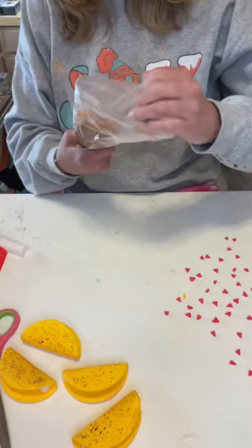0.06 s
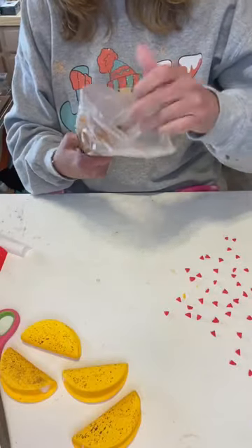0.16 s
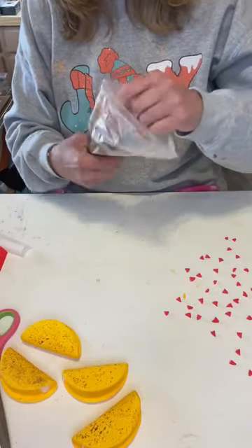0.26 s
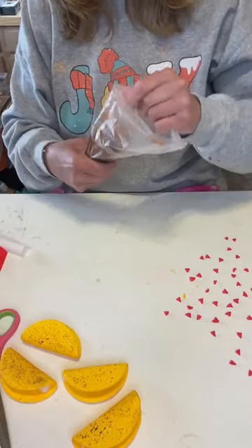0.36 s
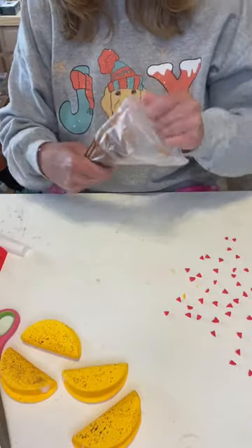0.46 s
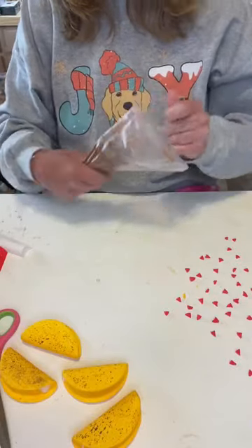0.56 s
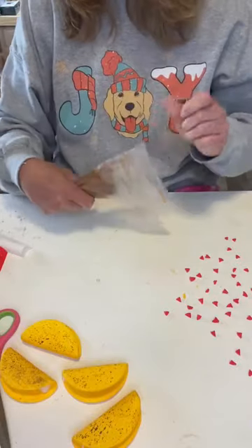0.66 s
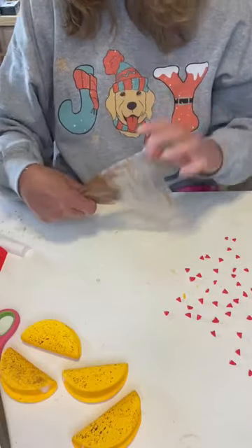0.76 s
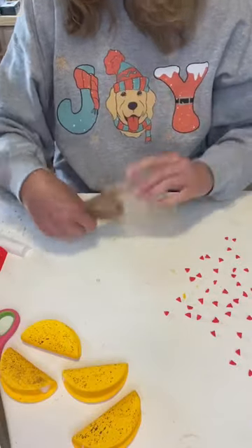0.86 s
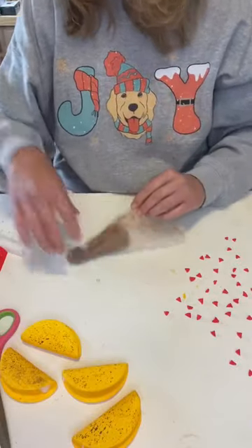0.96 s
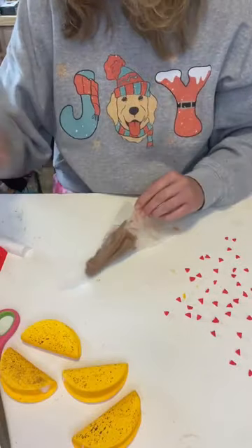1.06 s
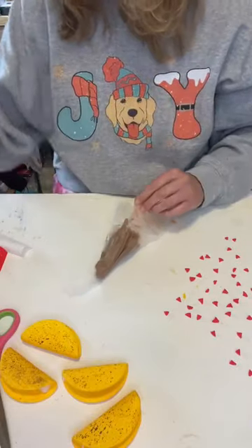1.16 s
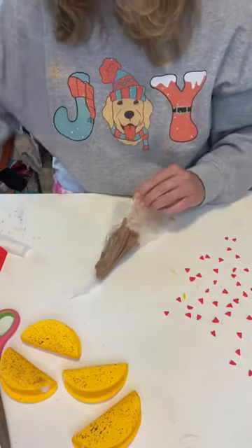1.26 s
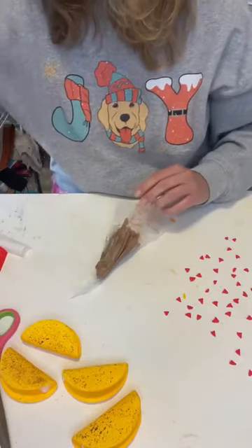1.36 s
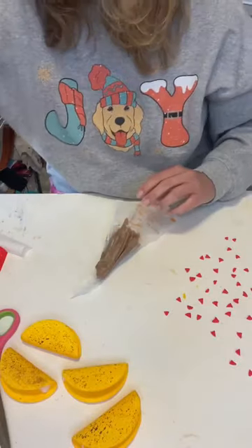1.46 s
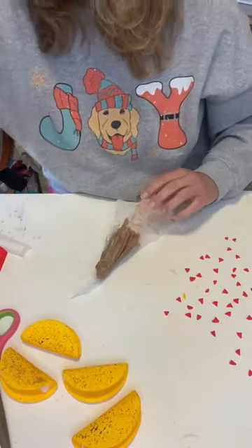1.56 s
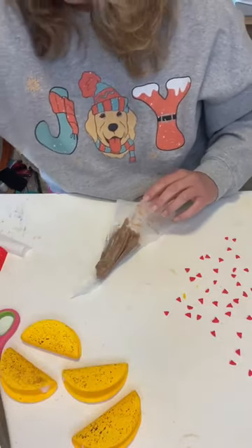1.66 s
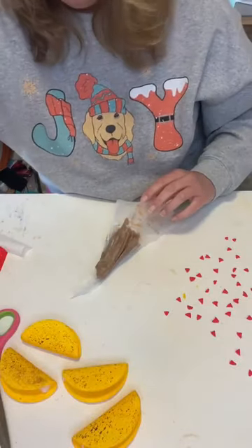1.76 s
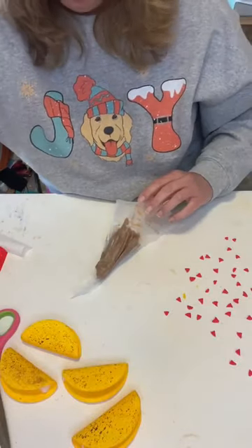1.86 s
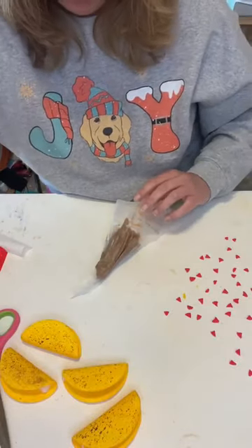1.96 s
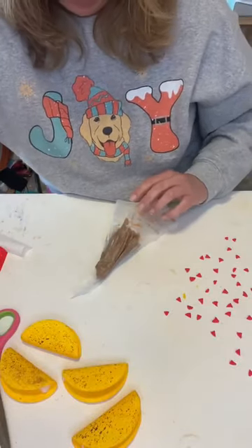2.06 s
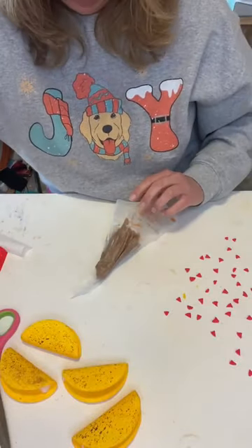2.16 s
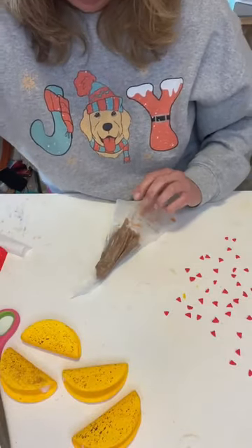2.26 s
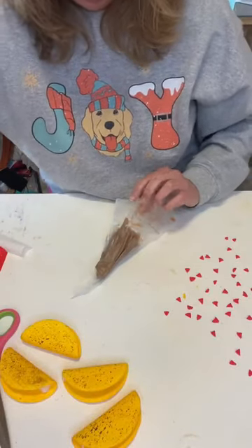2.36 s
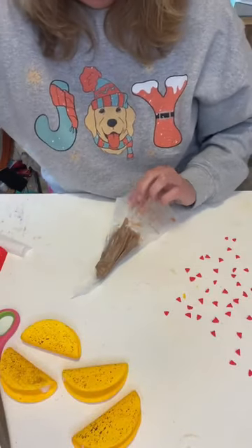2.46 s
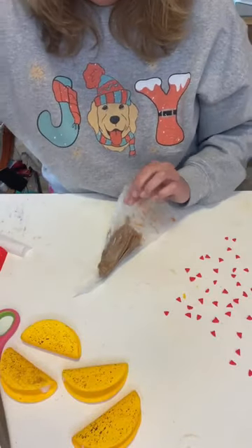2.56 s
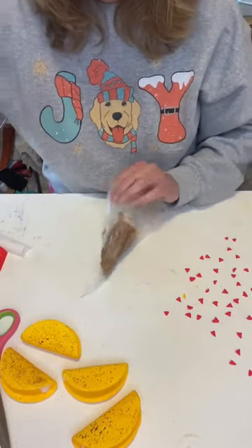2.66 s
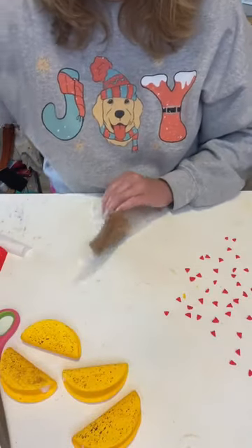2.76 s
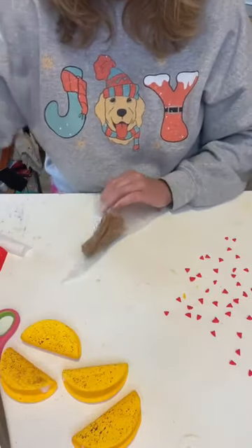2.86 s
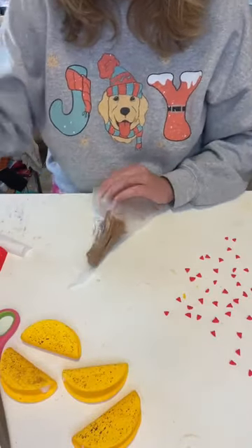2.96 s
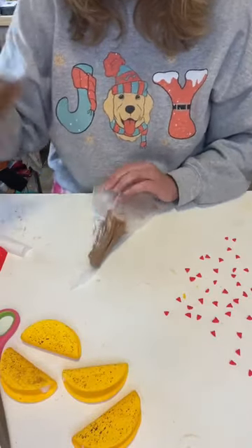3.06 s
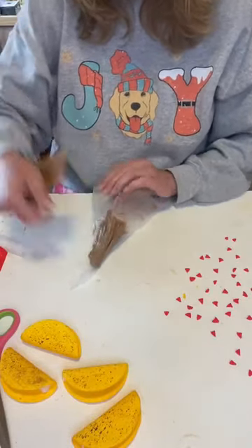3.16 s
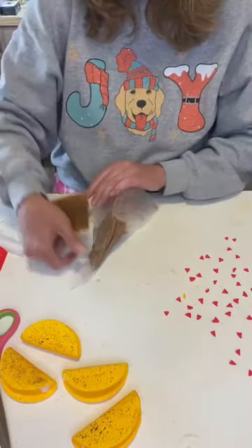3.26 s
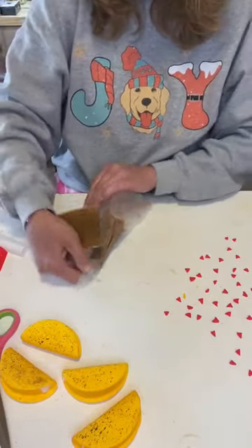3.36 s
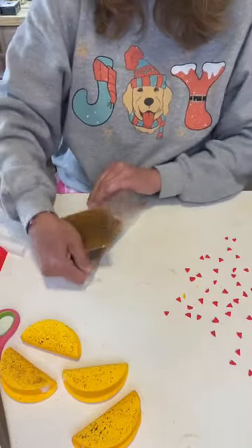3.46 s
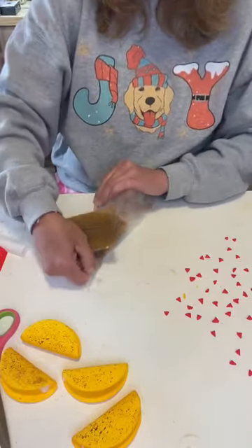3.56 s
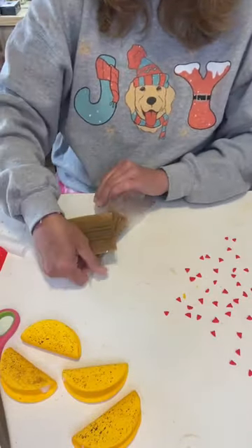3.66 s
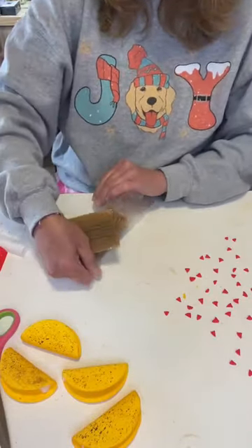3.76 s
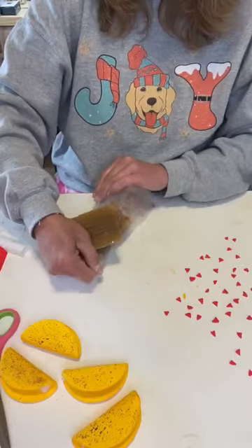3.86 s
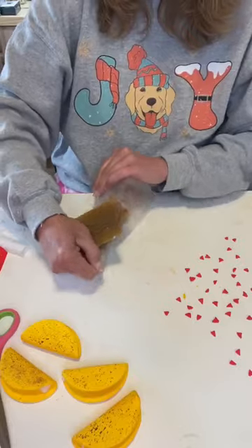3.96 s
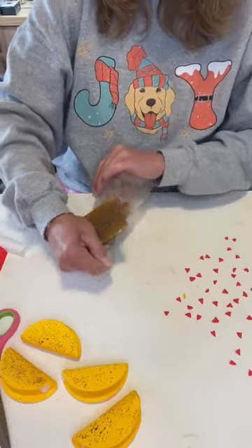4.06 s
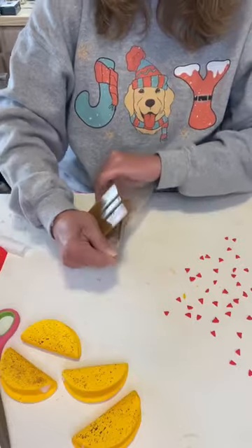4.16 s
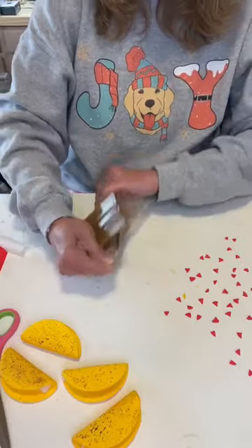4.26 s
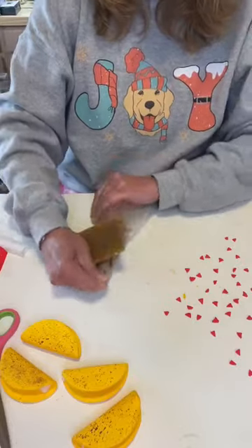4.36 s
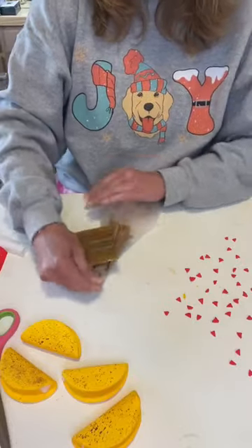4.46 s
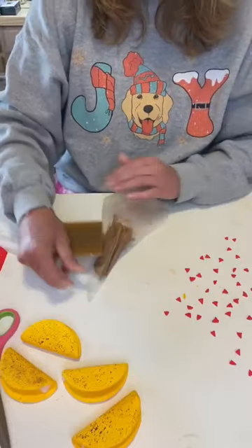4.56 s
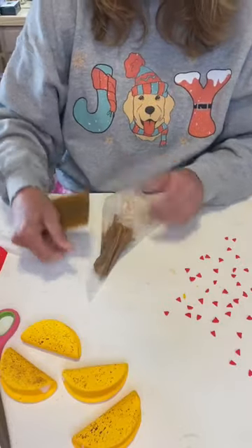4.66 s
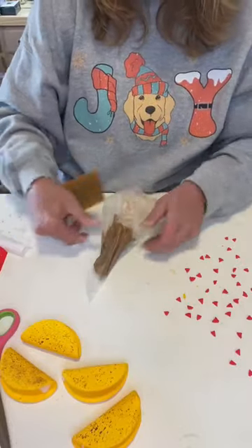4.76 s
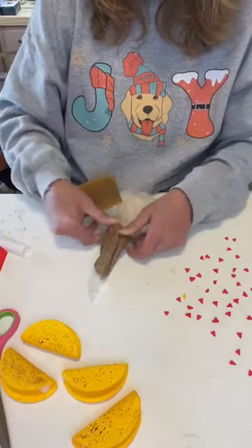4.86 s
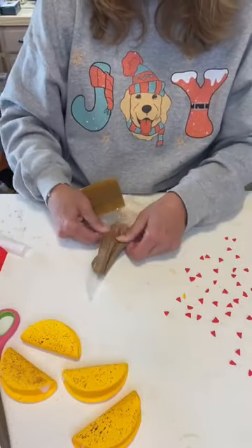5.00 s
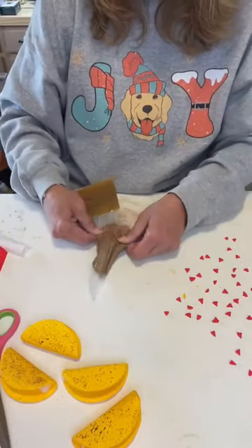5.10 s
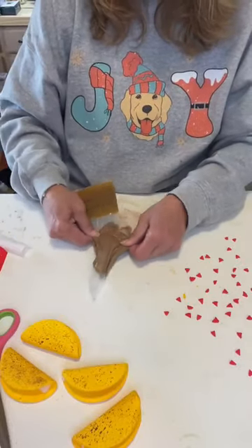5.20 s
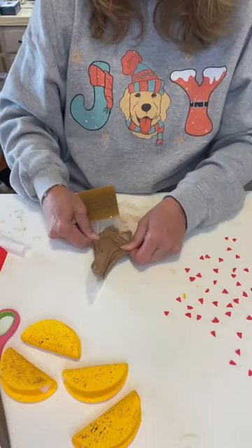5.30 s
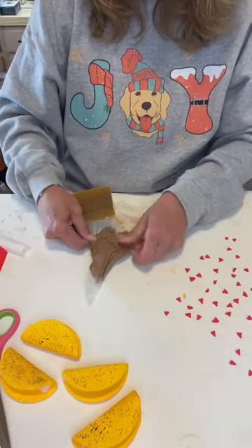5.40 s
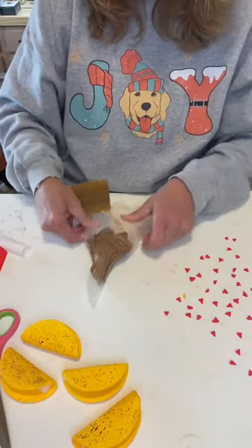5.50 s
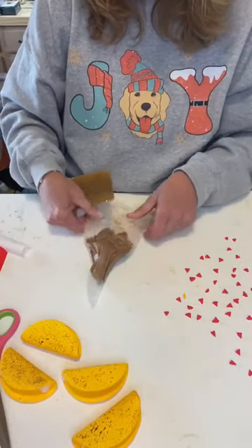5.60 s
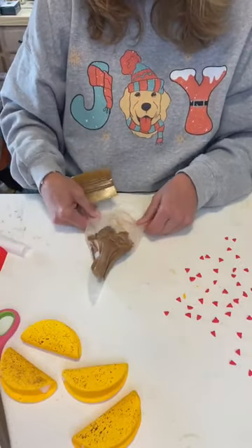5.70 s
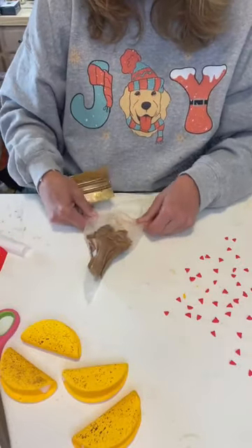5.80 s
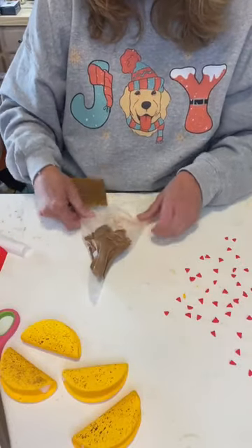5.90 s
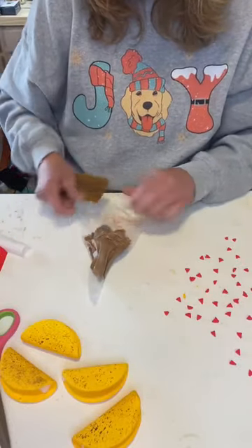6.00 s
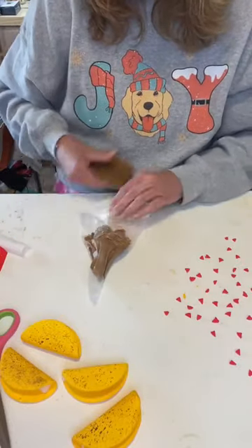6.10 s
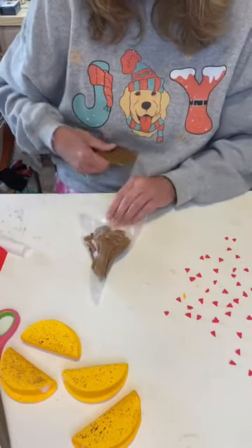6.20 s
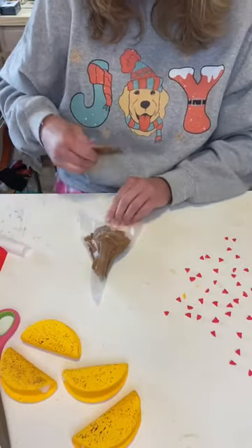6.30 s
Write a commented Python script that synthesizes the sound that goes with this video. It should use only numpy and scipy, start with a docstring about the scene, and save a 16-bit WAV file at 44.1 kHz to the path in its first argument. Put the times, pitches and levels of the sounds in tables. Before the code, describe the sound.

Hands work a thin plastic bag on a table, making uneven rustles and sharp little crackles with pauses between.

```python
"""Piping bag on a craft table

A thin plastic piping bag is shaken out and laid down, and a scraper pushes its filling along.
Each grip makes the film rustle in a swarm of tiny buckles, with a sharper snap when a crease flips.
Hands and scraper bump the table now and then; the room is small and quiet."""
import sys
import numpy as np
from scipy import signal
from scipy.fft import rfft, irfft
from scipy.io import wavfile

SR = 44100
rng = np.random.default_rng(int(sys.argv[2]) if len(sys.argv) > 2 else 0)


def put_to_file(sound):
    """Save the sound as 16-bit audio at rate SR, in the file named by the first command-line argument."""
    columns = np.atleast_2d(sound).T  # one column per channel
    safe = np.clip(columns, -1, 1)
    whole_steps = np.round(safe * 32767)
    wavfile.write(sys.argv[1], SR, whole_steps.astype(np.int16))


N = 279594
TIME = np.arange(N) / SR


def from_db(db):
    """Decibels to gain."""
    return 10 ** (np.asarray(db) / 20)


def unit_rms(x):
    """Scale to unit power."""
    return x / np.sqrt(np.mean(x ** 2) + 1e-20)


def at_hz(curve, hz):
    """Read a curve on a log-frequency axis."""
    f, value = np.transpose(curve)
    return np.interp(np.log(hz), np.log(f), value)


def drift(per_s):
    """A random wobble, gliding to `per_s` new values a second."""
    knots = rng.standard_normal(4096)
    return np.interp(TIME * per_s, np.arange(len(knots)), knots)


def bands():
    """A 24-band filter bank: centre in Hz and band-pass of each."""
    edges_hz = np.geomspace(22, 14000, 25)
    return [(np.sqrt(lo * hi), signal.butter(2, [lo, hi], "band", fs=SR, output="sos"))
            for lo, hi in zip(edges_hz, edges_hz[1:])]


def ring(force, hz, t60_s):
    """One mode: every click sets a dying sine ringing."""
    r, w = from_db(-60 / (t60_s * SR)), 2 * np.pi * hz / SR
    return signal.lfilter([0, np.sin(w)], [1, -2 * r * np.cos(w), r * r], force + 1e-18)


def resonance(x, hz, width_hz):
    """The part of a sound that one resonant peak lets through."""
    return signal.lfilter(*signal.iirpeak(hz, hz / width_hz, fs=SR), x)


# Room tone EQ: f/Hz, gain/dB
ROOM_TONE_EQ = [(25, -12), (62, 5), (95, 0), (135, 1), (250, -2.5), (500, -7.5), (1000, -20), (1800, -7),
                (2600, -14), (3300, -32), (5000, -23), (9000, -31.5), (13000, -33)]
def room_tone(level_db=-73):
    """The low, steady hush of the room."""
    hush = sum(from_db(at_hz(ROOM_TONE_EQ, hz)) * signal.sosfilt(sos, rng.standard_normal(N))
               for hz, sos in bands())
    return from_db(level_db) * unit_rms(hush)


# Decay of the room's tail: f/Hz, t60/s
REVERB_TIMES = [(100, 0.4), (1000, 0.36), (4000, 0.32), (12000, 0.27)]
def reflections(x, tail_db=-7, early_db=-6, early_decay_s=0.0037):
    """Quick scatter from the table and the person at it, then the tail from the walls."""
    t = np.arange(SR // 2) / SR
    tail = sum(signal.sosfilt(sos, rng.standard_normal(len(t)))
               * from_db(-60 * t / at_hz(REVERB_TIMES, hz)) for hz, sos in bands())
    tail *= t > .008  # pre-delay
    early = rng.standard_normal(len(t)) * np.exp(-t / early_decay_s) * (t > .001)
    echoes = from_db(tail_db) * tail / np.linalg.norm(tail)
    echoes += from_db(early_db) * early / np.linalg.norm(early)
    return signal.fftconvolve(x, echoes)[:N]


def moving_reflections(x, turn_hz=2.3):
    """The bag keeps moving, so one pattern of reflections melts into another."""
    angle = 2 * np.pi * turn_hz * TIME + drift(5)
    return np.cos(angle) * reflections(x) + np.sin(angle) * reflections(x)


# Side-channel EQ, ahead of its low cut: f/Hz, gain/dB
SIDE_EQ = [(4000, -20.5), (7000, -1.5), (10000, -0.5), (13000, -8)]
def stereo_width(x, low_cut_hz=4200):
    """Only the treble of the reflections differs between left and right."""
    bin_hz = np.arange(1, N + 2) * SR / (2 * N)
    side = irfft(rfft(x, 2 * N) * from_db(at_hz(SIDE_EQ, bin_hz)))[:N]
    return signal.sosfilt(signal.ellip(8, .5, 70, low_cut_hz, "high", fs=SR, output="sos"), side)


# Modes of the table top: f/Hz, gain/dB, t60/s
TABLE_MODES = [(72.5, -1.5, 0.19), (104, 2.5, 0.061), (128.6, 6.5, 0.087), (161.5, 2, 0.074),
               (248, -6, 0.085), (353, -6, 0.036), (510, 0, 0.077)]
# Soft knocks from hands and scraper: t/s, push/dB, contact/s
BUMP_CUES = [(1.097, -63, 0.0026), (1.136, -53, 0.0059), (1.582, -67, 0.0028), (3.478, -46, 0.0028),
             (3.498, -48.5, 0.0036), (4.468, -37, 0.0022), (4.477, -36, 0.0039), (4.976, -59, 0.0021),
             (5.37, -41.5, 0.008), (5.871, -43, 0.014), (6.312, -45.5, 0.0063)]
def table_bumps():
    """A soft push sets the table top swinging; a longer contact sounds deeper."""
    force = np.zeros(N)
    for start_s, db, contact_s in BUMP_CUES:
        push = np.sin(np.pi * np.clip((TIME - start_s) / contact_s, 0, 1)) ** 2
        force += from_db(db) * push / push.sum()
    return sum((-1) ** k * from_db(db) * ring(force, hz, t60_s)  # modes alternate in polarity
               for k, (hz, db, t60_s) in enumerate(TABLE_MODES))


# Brief tones from taut panels of film: t/s, f/Hz, relative level/dB, swell/s
PANEL_CUES = [(0.131, 2220, -40, 0.018), (1.999, 1550, -54, .008), (2.881, 1630, -45.5, 0.0066),
              (3.048, 1540, -46.5, 0.0067), (4.04, 2030, -47, 0.0052), (4.217, 4070, -52, 0.0037),
              (5.058, 1800, -43.5, 0.0075), (5.245, 1940, -42, .005)]
def panel_drumming(width_hz=240):
    """A taut panel is shaken by the buckles round it and gives a short, grainy tone."""
    out = np.zeros(N)
    for start_s, hz, db, swell_s in PANEL_CUES:
        age = np.clip((TIME - start_s) / swell_s, 0, 30)
        tone = unit_rms(resonance(rng.standard_normal(N), hz, width_hz))
        out += from_db(db) * age * np.exp(1 - age) * tone
    return out


# Resonances of the bag lying over the table: f/Hz, width/Hz, gain/dB
BAG_RESONANCES = [(503, 25, 2), (659, 39, -6.5), (919, 69, 4.5), (1630, 68, 2.5), (2390, 220, 2),
                  (3370, 590, 4.5), (6800, 600, -0.5)]
def bag_body(x):
    """The bag colours the sound of its film with a chain of peaks and dips."""
    for hz, width_hz, db in BAG_RESONANCES:
        x = x + (from_db(db) - 1) * resonance(x, hz, width_hz)
    return x


def facet_pops(level_db, crease_db, per_s=200, ring_cycles=22, gain_db=-11, count=72):
    """Small facets pop through at random, each ringing for a moment at its own pitch."""
    pops = (rng.random(N) < per_s / SR) * rng.standard_normal(N)
    which_facet = rng.integers(0, count, N)
    pitches_hz = np.geomspace(1200, 9500, count) * (1 + 0.013 * rng.standard_normal(count))
    registers = np.zeros((2, N))
    for k, hz in enumerate(pitches_hz):
        registers[int(hz > 4000)] += ring(pops * (which_facet == k), hz, ring_cycles / hz)
    low, high = map(unit_rms, registers)
    return from_db(level_db + gain_db) * (low + from_db(crease_db) * high)


# EQ shared by all snaps: f/Hz, gain/dB
SNAP_EQ = [(100, -14.5), (400, -9.5), (900, -5.5), (1800, 1), (3500, -2.5), (7000, -2.5), (10000, -11.5),
           (13000, -29.5)]
# Creases flipping over: t/s, relative level/dB, tilt/(dB per decade), run through the film/s
SNAP_CUES = [(.153, -30.5, 6, 0.0089), (.338, -34, 7, 0.0015), (.402, -31.5, 3, .003),
             (.72, -34, 2, 0.0017), (0.974, -39, -7, .001), (1.028, -41.5, 30, 0.0064),
             (1.102, -29, 26, 0.0045), (1.311, -35, -7, 0.00097), (1.71, -61, -14, 0.0012),
             (1.782, -37.5, -8, .0013), (1.887, -51.5, 1, .002), (2.004, -46, -7, 0.0017),
             (2.276, -25.5, -11, 0.0011), (2.37, -19, -.5, 0.0014), (2.378, -20.5, -11.5, .0006),
             (2.664, -29, 8, 0.0031), (2.794, -34, 28, 0.0015), (2.877, -29.5, -12, 0.0048),
             (3.4, -50, -13, 0.0024), (3.473, -38, -7, 0.0024), (3.551, -27, 4, 0.0039),
             (4.195, -32.5, -7.5, 0.00058), (4.483, -35, 3, .0012), (4.763, -31, 8, 0.0011),
             (4.786, -33.5, 9, 0.0013), (4.97, -50.5, -19, .002), (5.025, -34, -8, 0.0029),
             (5.247, -32, 10, 0.0017), (5.485, -33.5, 13, 0.0016), (5.783, -36, 5, .0014),
             (5.838, -30, 3, 0.0032), (6.309, -45, 8, 0.0031)]
def crease_snaps(shiver_s=0.0058, shiver_db=-15, gain_db=-7, pivot_hz=2500):
    """A crease swells and runs out in a few milliseconds and leaves the film shivering."""
    t = np.arange(SR // 8) / SR
    envelopes = []
    for *_, run_s in SNAP_CUES:
        flip = t / run_s * np.exp(1 - t / run_s)
        shiver = (1 - np.exp(-t / run_s)) * np.exp(-t / shiver_s)
        envelopes.append(flip + from_db(shiver_db) * shiver)
    out = np.zeros(N)
    for hz, sos in bands():
        force = np.full(N + len(t), 1e-18)
        bursts = envelopes * rng.standard_normal((len(SNAP_CUES), len(t)))
        for (start_s, db, tilt_db, _), burst in zip(SNAP_CUES, bursts):
            i = round(start_s * SR)
            force[i:i + len(t)] += from_db(db + tilt_db * np.log10(hz / pivot_hz)) * burst
        out += from_db(at_hz(SNAP_EQ, hz) + gain_db) * signal.sosfilt(sos, force[:N])
    return out


# Hand moves: shake out, lay down (0.9 s), rest and shift (1.6 s), scrape (3.5 s), pull and let go (5 s).
# t/s, tighten/s, hold/s, level/dB, tight-crease offset/dB, slack-panel offset/dB
GRIP_CUES = [ (0, 0.0017, 0.06, -45, 2.5, -6), (0.049, 0.054, 0.073, -38, 0.5, -10.5),
             (.2, 0.014, 0.065, -47.5, 1, -8.5), (.29, .02, .04, -53, 0, -10.5),
             (.397, 0.012, .015, -47.5, 1.5, -6.5), (0.431, .04, 0.11, -40, -0.5, -7.5),
             (.6, 0.018, 0.041, -48.5, -2.5, -13), (.69, 0.053, 0.012, -43.5, -1.5, -6.5),
             (.78, 0.017, .015, -56, -4, -3), (.86, 0.035, .05, -68.5, -8, -12),
             (.972, 0.051, 0.097, -49, -1.5, -9.5), (1.062, 0.029, 0.057, -36.5, 0, -9),
             (1.214, 0.01, 0.0074, -52.5, 4.5, -11), (1.299, 0.0091, .05, -62.5, 3.5, -8.5),
             (1.375, 0.019, 0.024, -55.5, 1.5, -10.5), (1.45, 0.015, 0.02, -63, -9, -8.5),
             (1.565, 0.013, 0.01, -70, -24, 1), (1.777, 0.0032, 0.0051, -63, -7, -4.5),
             (1.885, 0.022, 0.12, -66, -10.5, -4), (1.995, 0.011, 0.0094, -62.5, -1, -25),
             (2.105, 0.023, 0.13, -63, -15, -8.5), (2.21, 0.033, .025, -58.5, -2.5, -11),
             (2.255, 0.023, .035, -47.5, -3.5, -8), (2.367, 0.0033, 0.0088, -44.5, -4.5, -13.5),
             (2.44, .02, 0.056, -57, 0.5, -10), (2.56, 0.028, 0.055, -55, 0, -10),
             (2.659, .01, 0.16, -43, 0, -9), (2.86, .02, 0.083, -39, -1, -12),
             (3.0, .04, 0.11, -48.5, -1, -10), (3.455, .02, .03, -52, -4, -9.5),
             (3.533, 0.016, 0.12, -44, -0.5, -10.5), (3.725, 0.027, 0.069, -48, 1.5, -12),
             (3.869, 0.039, .13, -50.5, 0.5, -12.5), (4.066, 0.016, .015, -48, 3.5, -14.5),
             (4.191, 0.015, 0.06, -54.5, 2, -9.5), (4.28, 0.016, .005, -48, 3.5, -4.5),
             (4.34, 0.048, 0.09, -53.5, 2.5, -11), (4.421, 0.072, 0.011, -38.5, -1, -10.5),
             (4.53, 0.014, 0.084, -48, -1, -11.5), (4.65, 0.01, 0.13, -57, -2, -4),
             (5.015, 0.064, .14, -43, 0.5, -8), (5.211, 0.028, 0.08, -43, -2.5, -14.5),
             (5.3, 0.034, 0.035, -42, -4, -9.5), (5.389, 0.026, 0.09, -51, -3, -8),
             (5.529, 0.015, 0.056, -54, -4, -9.5), (5.65, 0.045, 0.14, -62, -10, -3.5),
             (5.725, 0.019, .03, -59, 0, -5), (5.776, 0.014, 0.026, -46.5, 2, -11.5),
             (5.813, .025, 0.0082, -37, 0.5, -15), (5.88, 0.019, 0.05, -42.5, 2.5, -12),
             (6.006, 0.025, 0.064, -49, 2.5, -12.5), (6.185, .02, 0.059, -66.5, -7, -1),
             (6.297, .015, .03, -54, 3, -12)]
def handling(sag_db_per_s=28, release_db_per_s=279):
    """Each grip tightens, runs out of folds while held, then settles: level and two offsets in dB."""
    power = np.full((3, N), 1e-10)  # overlapping grips add in power
    for start_s, tighten_s, hold_s, db, crease_db, panel_db in GRIP_CUES:
        age_s = TIME - start_s
        held_s = np.clip(age_s - tighten_s, 0, hold_s)
        eased_s = np.clip(age_s - tighten_s - hold_s, 0, 1)
        attack = np.clip(age_s / tighten_s, 0, 1)
        envelope = attack * from_db(db - sag_db_per_s * held_s - release_db_per_s * eased_s)
        power += np.outer(from_db([0, crease_db, panel_db]) ** 2, envelope ** 2)
    level, creases, panels = 10 * np.log10(power)
    return level, creases - level, panels - level


# Film EQ, before lows, mids and highs are balanced: f/Hz, gain/dB
RUSTLE_EQ = [(50, -17.5), (80, -8), (130, -3), (250, -7), (450, -3.5), (700, -2), (1050, -5), (1700, 4),
             (2400, -.5), (3400, -3), (4800, -6), (8300, -1.5), (10400, -12.5), (13000, -24.5)]
def rustle(level_db, crease_db, panel_db, density_slope=.45, size_db=2.0, clump_db=1.0, patchy_db=2.0):
    """Tiny buckles, denser as the film is worked harder; each hits every band with its own strength."""
    per_s = 6000 * from_db(density_slope * (level_db + 40))
    buckles = np.flatnonzero(rng.random(N) < per_s / SR)
    accent_db = size_db * np.minimum(rng.exponential(1, N), 3)
    # one buckle sets off its neighbours, so their strength comes in clumps
    size = from_db(accent_db + clump_db * drift(140)) / np.sqrt(per_s)
    registers = np.zeros((3, N))  # slack panels low, plain folds mid, tight creases high
    for hz, sos in bands():
        clicks = np.full(N, 1e-18)
        clicks[buckles] = (size * rng.standard_normal(N))[buckles]
        band_gain = from_db(at_hz(RUSTLE_EQ, hz) + patchy_db * drift(45))
        registers[np.searchsorted([1000, 4000], hz)] += band_gain * signal.sosfilt(sos, clicks)
    panels, folds, creases = map(unit_rms, registers)
    blend = from_db(panel_db - 1.5) * panels + from_db(-3.5) * folds + from_db(crease_db - 0.5) * creases
    return from_db(level_db) * blend


def scene(bag_gain_db=-2.0):
    """Bag, table and room sit in the middle, with a little width in the treble."""
    level_db, crease_db, panel_db = handling()
    film = rustle(level_db, crease_db, panel_db) + facet_pops(level_db, crease_db) + crease_snaps()
    bag = from_db(bag_gain_db) * (bag_body(film) + panel_drumming())
    mid = bag + moving_reflections(bag) + table_bumps() + room_tone()
    side = stereo_width(moving_reflections(bag))
    return np.array([mid + side, mid - side])


def record(dry, low_cut_hz=46, high_cut_hz=13200):
    """The small microphone drops the deepest bass; the top is cut steeply."""
    thin = signal.sosfilt(signal.butter(4, low_cut_hz, "high", fs=SR, output="sos"), dry)
    return signal.sosfilt(signal.ellip(10, .2, 80, high_cut_hz, fs=SR, output="sos"), thin)


dry = scene()
out = record(dry)
put_to_file(out)
```